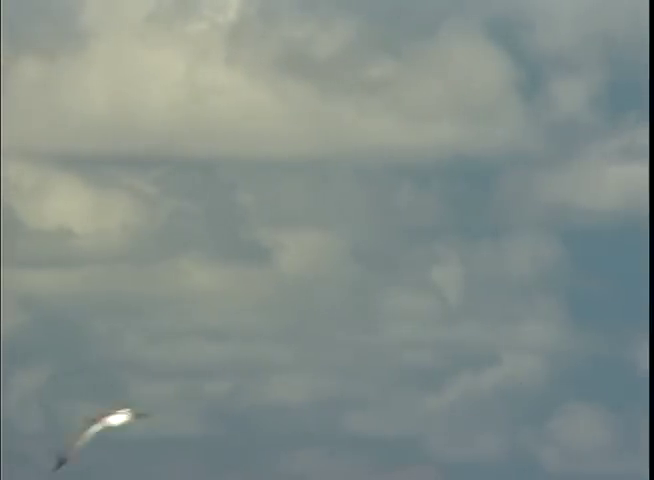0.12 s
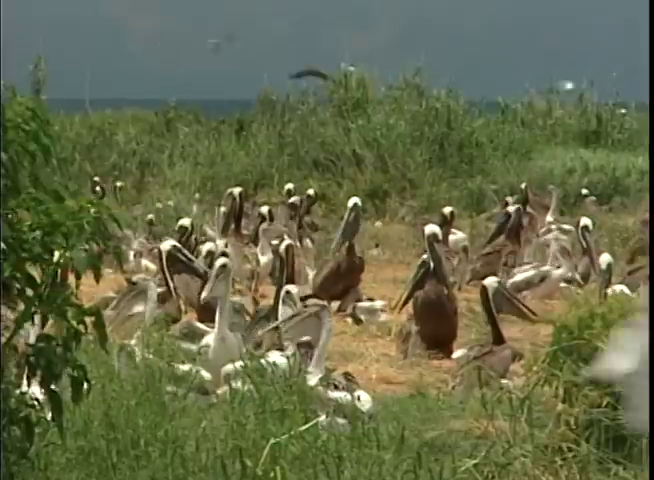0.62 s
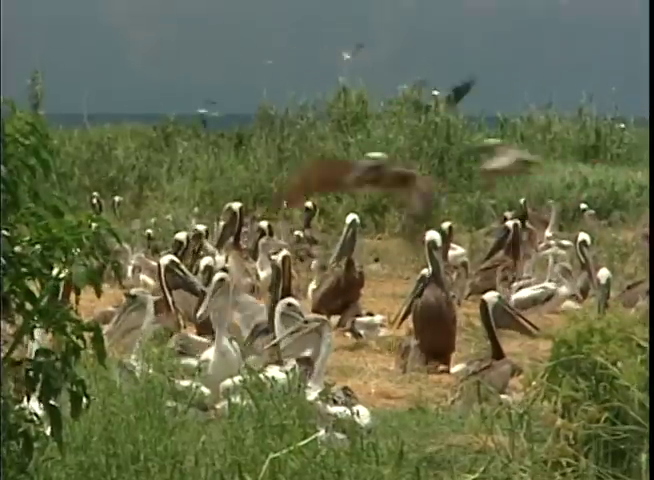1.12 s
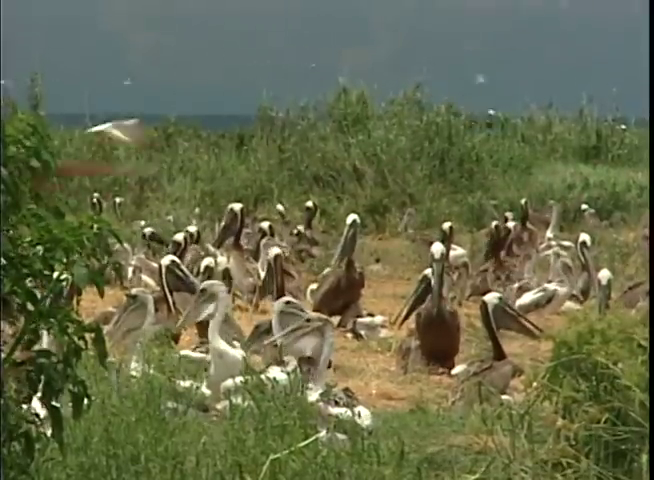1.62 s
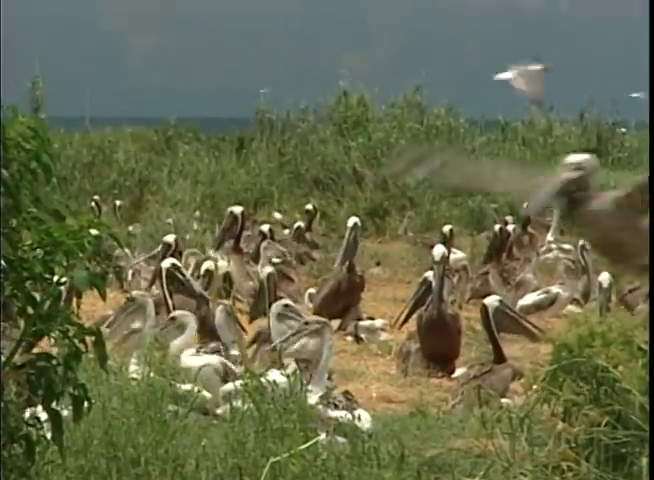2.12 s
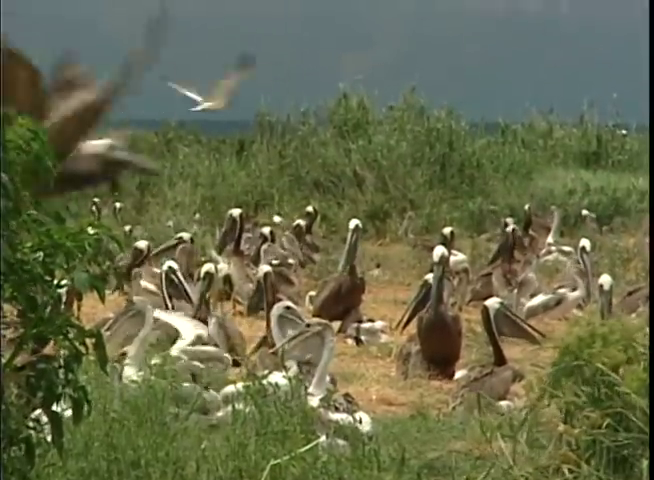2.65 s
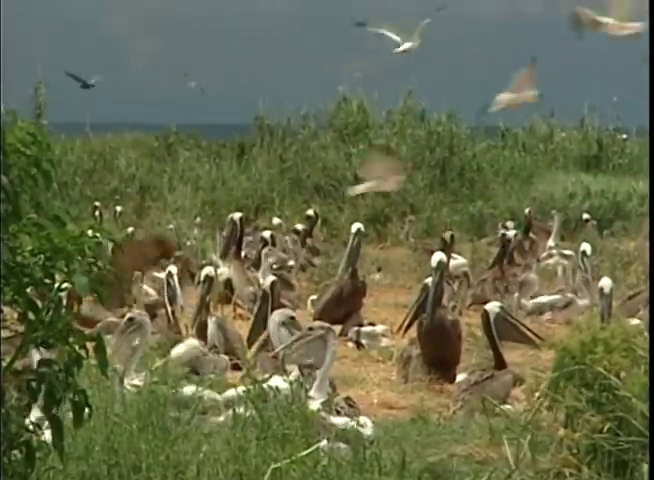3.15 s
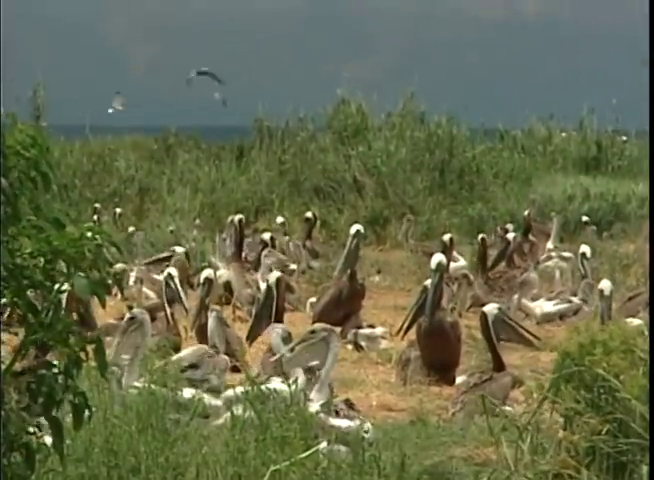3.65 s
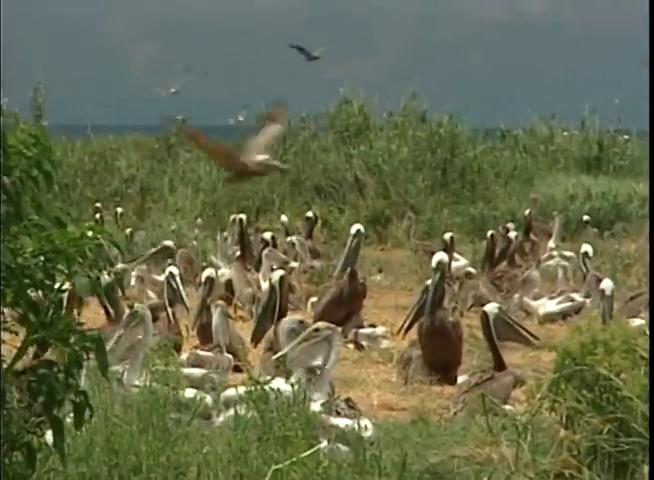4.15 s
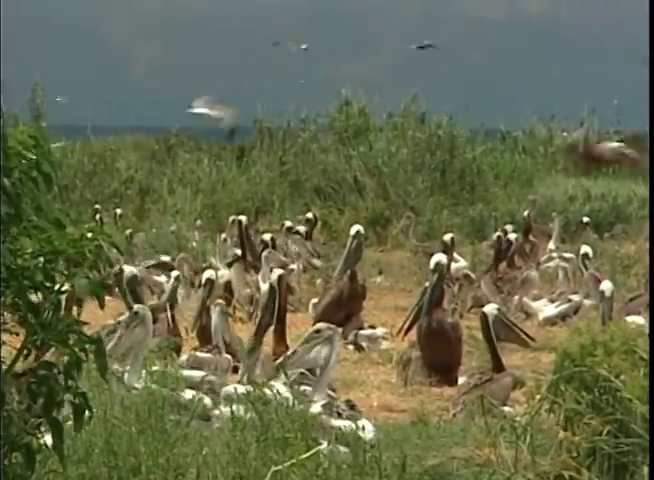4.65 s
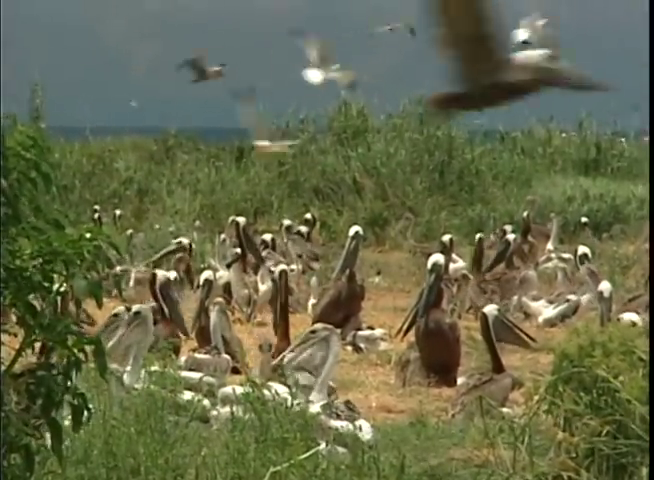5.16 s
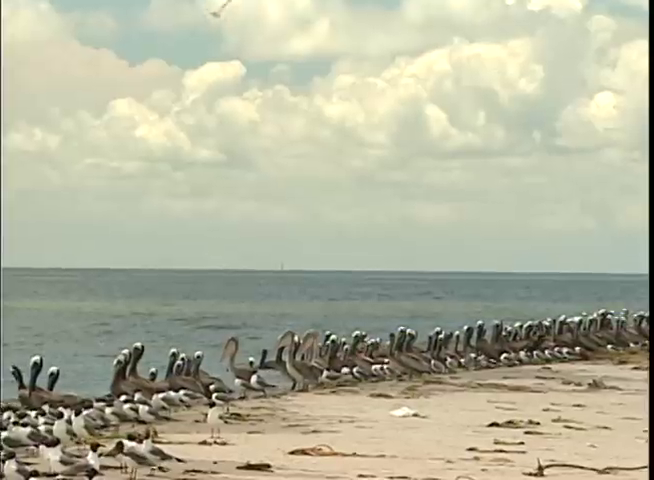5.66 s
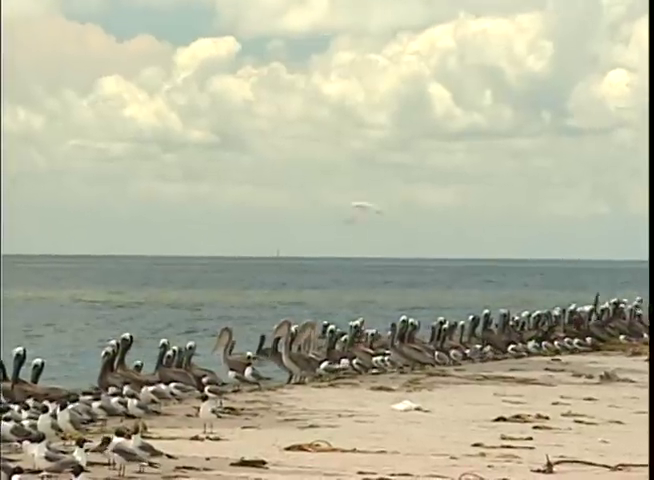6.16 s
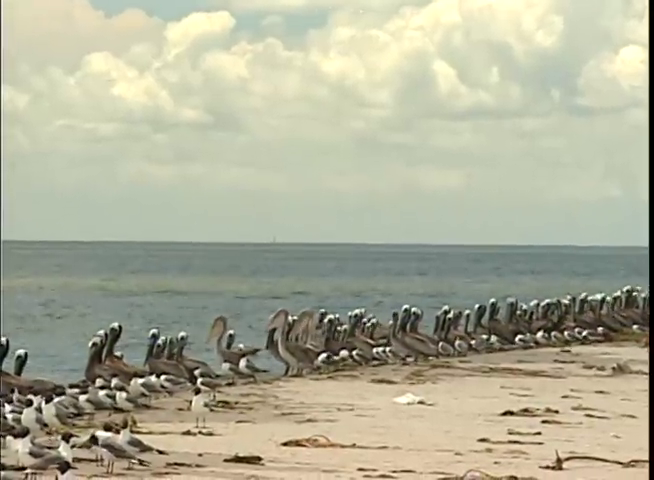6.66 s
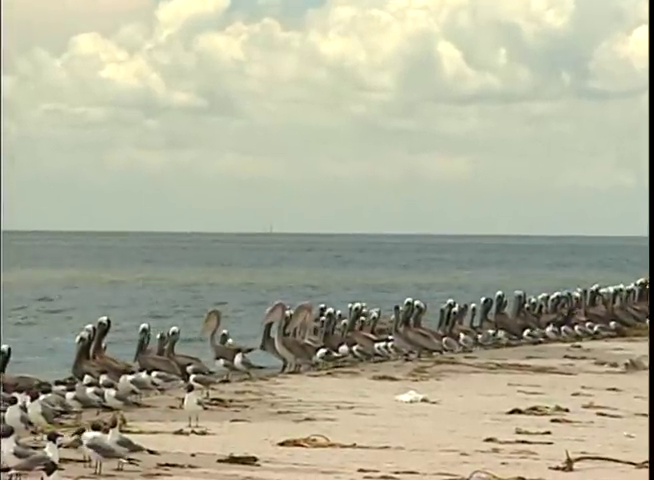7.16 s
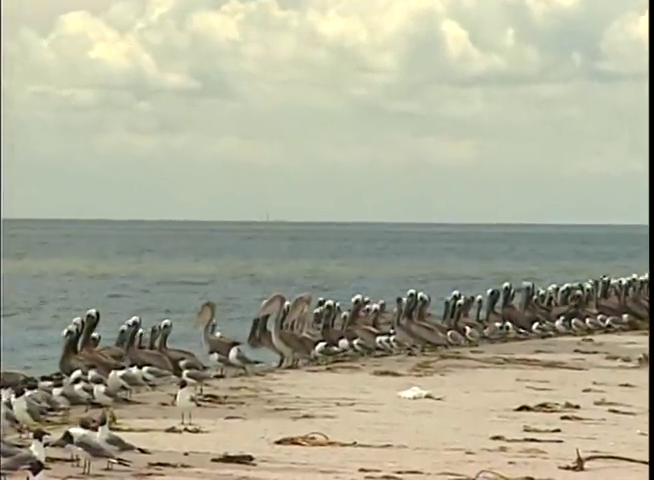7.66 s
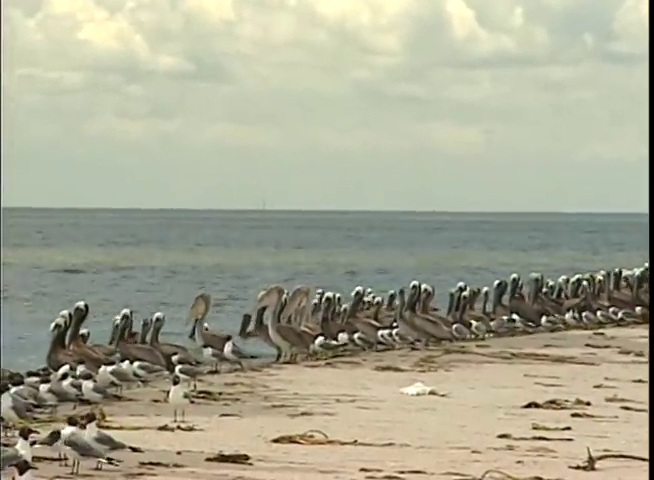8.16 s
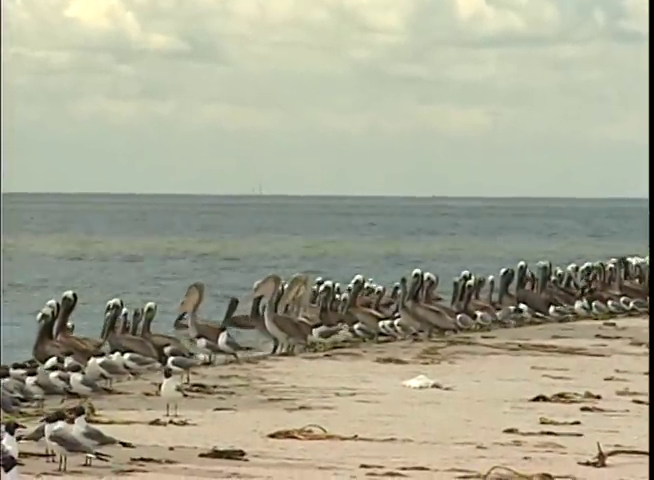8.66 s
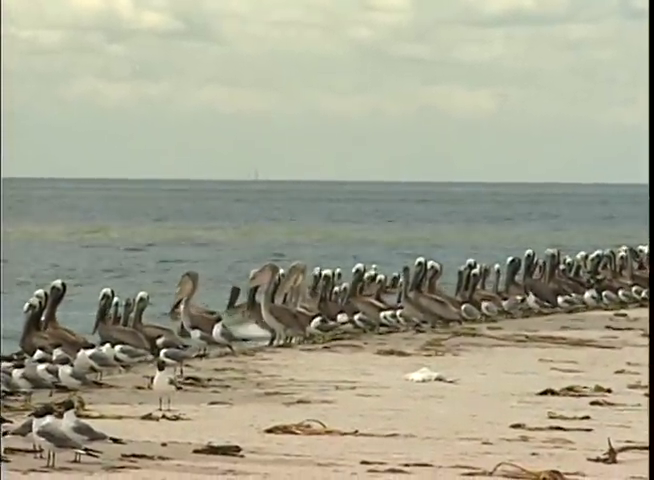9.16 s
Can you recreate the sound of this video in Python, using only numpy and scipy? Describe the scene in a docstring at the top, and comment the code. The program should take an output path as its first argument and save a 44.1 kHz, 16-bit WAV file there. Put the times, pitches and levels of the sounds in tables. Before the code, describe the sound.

Countless gulls and terns scream over each other, then an abrupt change to thinner cries, raspy terns, wind rumble and soft waves.

```python
"""Gulls and terns call over one another in a crowded colony, over blurred far voices and a faint camera hum.
Harmonic stacks make the squeals, calls, rattling laughs and wails; pulsed high noise adds treble grit.
At 5.728 s the scene moves to an open beach: sparser, weaker calls, over shaped noise for hiss and waves;
terns rasp in noise pulses that ring resonances. Low-frequency noise buffets the microphone throughout."""
import sys
import numpy as np
from scipy import signal
from scipy.fft import rfft, irfft
from scipy.io import wavfile
from scipy.ndimage import uniform_filter1d

SR = 44100
rng = np.random.default_rng(int(sys.argv[2]) if len(sys.argv) > 2 else 0)


def makeup_ratio(level_db):
    """Linear amplitude ratio for a level in decibels (20 dB per factor of ten)."""
    decades = np.asarray(level_db, float) / 20
    return 10 ** decades


def to_wav(sig):
    """Store sig (one row per channel, or 1-D mono) as 16-bit WAV at the path in sys.argv[1].

    Samples outside -1..1 are clipped; the rate is SR.
    """
    pcm = np.clip(np.atleast_2d(sig), -1, 1) * 32767
    pcm = np.round(pcm).astype(np.int16)
    wavfile.write(sys.argv[1], SR, pcm.T)  # frames by channels


N = 409688
TIME = np.arange(N) / SR
CUT_S = 5.728  # colony to beach


def evened(x):
    """Scales to rms 1."""
    return x / np.sqrt(np.mean(x ** 2) + 1e-20)


def read(points, hz):
    """Reads a curve along log frequency."""
    f, value = np.transpose(points)
    return np.interp(np.log(hz + 1), np.log(f + 1), value)


def follow(rows, t, column=1):
    """Reads a table column along its first column."""
    columns = np.transpose(rows)
    return np.interp(t, columns[0], columns[column])


def add(mix, start_s, sound):
    """Adds a sound in place, trimmed at the end of the mix."""
    part = mix[max(round(start_s * SR), 0):][:len(sound)]
    part += sound[:len(part)]


def wander(count, span):
    """Noise of rms 1, smoothed over span samples."""
    return evened(uniform_filter1d(rng.standard_normal(count), int(span)))


# Stereo likeness of the noises. Each row: frequency in Hz, left-right correlation 0-1.
LIKENESS = [(60, 0.995), (500, 1), (2000, 1), (5000, 0.92), (9000, 0.99), (15000, 0.51)]


def hiss(colour, patchy_db, size=1024):
    """Two-channel noise of rms 1 from random short-time spectra with drifting patches."""
    frames, hz = 4 * N // size + 5, np.fft.rfftfreq(size, 1 / SR)
    a, b, c, d, patches = rng.standard_normal((frames, len(hz), 5)).T
    patches = evened(uniform_filter1d(uniform_filter1d(patches, 8, 0), 8, 1))
    same = np.clip(read(LIKENESS, hz), -1, 1)[:, None]
    left = a + 1j * b
    right = same * left + np.sqrt(1 - same ** 2) * (c + 1j * d)
    spectra = np.array([left, right]) * makeup_ratio(read(colour, hz)[:, None] + patchy_db * patches)
    return evened(signal.istft(spectra, nperseg=size, noverlap=3 * size // 4)[1][:, :N])


# What an open beak passes. Each row: frequency in Hz, gain in dB.
THROAT = [(853, -21.5), (1530, -17.5), (2121, 1), (2872, 0), (3723, -3), (4673, -0.5), (5724, -7),
          (6874, -13), (8441, -21.5)]


def cry(pitch_hz, bright_db, odd_db, jitter, flutter, uneven_db=.7, shine_db=0, hoarse=.06, ringing=()):
    """A throat-coloured harmonic stack, unsteady in pitch and level, with edges of under 2 ms.
    bright_db is per octave about 3 kHz; ringing lists (harmonic, dB)."""
    count = len(pitch_hz)
    turns = np.cumsum(pitch_hz * (1 + jitter * wander(count, 51))) / SR
    k = np.arange(1, 15500 // pitch_hz.max() + 1)
    hz = k * pitch_hz.mean()
    db = read([(560, -57)] + THROAT + [(15000, -56.0)], hz)
    db += bright_db * np.log2(np.minimum(hz, 9000) / 3000) + odd_db * (k % 2)
    db += shine_db * np.clip(np.log2(hz / SHINE_HZ), 0, 1)
    db += sum(lift_db * (k == harmonic) for harmonic, lift_db in ringing)
    db += uneven_db * rng.standard_normal(len(k))  # head angle and ground echo favour some harmonics
    phases = turns * k[:, None] + rng.random((len(k), 1))
    stack = evened(makeup_ratio(db) @ np.cos(2 * np.pi * phases))
    t = np.arange(count) / SR
    breath = np.minimum(t / 0.00173, 1) * np.minimum(t[::-1] / 0.0018, 1)
    roughness = evened(uniform_filter1d(wander(count, 53), 40))
    return stack * breath * (1 + flutter * wander(count, 250.3) + hoarse * roughness)


SHINE_DB_PER_DB, SHINE_FROM_DB, SHINE_HZ = 2, -31, 6600


def shine(db):
    """Lift in dB of the top harmonics, more the nearer (louder) the bird."""
    return SHINE_DB_PER_DB * np.clip(db - SHINE_FROM_DB, 0, 8)


# Relative loudness of the bird mass, far din included. Each row: time in seconds, level in dB.
MASS_LEVEL = [(0.0, -22), (0.31, -26), (0.75, -25.5), (0.95, -24.5), (1.5, -28.5), (1.94, -24), (2.07, -27),
              (3.3, -25), (3.45, -33), (3.5, -27.5), (4.55, -27.5), (5.13, -26.5), (5.153, -30.5),
              (5.19, -25.5), (5.686, -25), (5.72, -26), (5.74, -38), (6.62, -36), (6.81, -39),
              (7.37, -38.5), (7.77, -36.5), (8.54, -35.5), (8.95, -38), (9.29, -36)]


def mass_gain():
    """Gain shared by the crowd and the far din as the mass of birds swells and thins."""
    return makeup_ratio(follow(MASS_LEVEL, TIME))


YELP_HZ = 1300  # below this a near call takes the whole lift
# The chest favours some harmonics. Each row: harmonic number, lift in dB.
YELP_LIFT = [(1, 6), (2, 4), (3, -2), (6, 3)]


def crowd(count=460):
    """Many birds in a steady stream: yelps that rise fast and sag, short high chirps, some throbbing."""
    out = np.zeros(N)
    for i, row in enumerate(rng.random((count, 8))):
        when, kind, height, span, arch, size, bright, throb = row
        chirp = kind < .35
        length_s = (.018 + .035 * span) if chirp else (.03 + .1 * span ** 2)
        u = np.linspace(0, 1, int(SR * length_s))
        base_hz = (1900 + 1200 * height) if chirp else (820 + 380 * height)
        pitch_hz = base_hz * (1 + (0.025 + .07 * arch) * (np.sin(np.pi * u ** .7) - .9 * u))
        throb_hz = 28 + 400 * throb ** 2
        pulse = np.tanh(2 * np.sin(2 * np.pi * throb_hz * u * len(u) / SR))
        beats = 1 + 0.26 * (throb < .5) * pulse
        voice = cry(pitch_hz, 5 * bright - 4.5, -4.0, jitter=0.0028, flutter=0.28, uneven_db=2.5,
                    hoarse=0.24, ringing=[] if chirp else YELP_LIFT[:1])
        start_s = (i + 4 * when) / count * N / SR - .08
        add(out, start_s, makeup_ratio(-7 * size - 0.83 * chirp) * beats * voice)
    out /= np.sqrt(uniform_filter1d(out ** 2, SR // 5) + 1e-12)  # a crowd this dense holds an even level
    return out * makeup_ratio(np.where(TIME < CUT_S, -6.0, -7.5))


# Far voices blurred together. Each row: frequency in Hz, relative density in dB per Hz.
COLONY_COLOUR = [(88, -43), (150, -8), (172, -20.5), (472, -23), (931, -15), (1180, -11.5), (1870, -1.5),
                 (2660, -6), (3490, -7), (4320, -7), (6000, -14.5), (13600, -40.5), (15600, -42)]


def colony_din(beach):
    """Far colony voices as patchy shaped noise, until the cut."""
    return (1 - beach) * makeup_ratio(-9.5) * hiss(COLONY_COLOUR, 3.0)


# The camera's own tone. Each row: frequency in Hz, colony level in dB rms.
HUM = [(123.8, -59.5)]


def hum(beach):
    """A sine of slightly wandering level, halved on the beach."""
    hz, rms_db = HUM[0]
    strength = (1 - .5 * beach) * (1 + 0.15 * wander(N, 2030)) * makeup_ratio(rms_db)
    return np.sqrt(2) * strength * np.sin(2 * np.pi * hz * TIME)


COLONY_BREEZE_DB, BEACH_BREEZE_DB = -62, -54.5  # between gusts, relative
LOW_CUT_HZ = 45  # the microphone's low cut thins the slowest rumble in the colony
GUST_EDGE_S = 0.064
# Gusts that buffet the microphone. Each row: start in seconds, length in seconds, relative level in dB.
GUSTS = [(0.206, 0.18, -42), (0.39, 0.15, -40.5), (1.046, 0.053, -47), (1.19, 0.088, -50), (5.7, 0.18, -45),
         (6.003, 0.71, -43), (6.755, 0.5, -44), (7.435, 0.37, -46), (8.053, 0.58, -53), (8.484, 0.53, -49),
         (8.9, 0.52, -45.5)]
# Rumble spectrum. Each row: frequency in Hz, relative density in dB per Hz.
WIND_COLOUR = [(8.8, -36), (15, 4), (45, 3), (112, -6.5), (147, -27.5), (220, -19.5), (290, -23.5),
               (480, -120)]


def wind(beach):
    """A lumpy low rumble: a light breeze with gusts on top, low-cut in the colony."""
    strength = makeup_ratio(COLONY_BREEZE_DB) * (1 - beach) + makeup_ratio(BEACH_BREEZE_DB) * beach
    for start_s, length_s, db in GUSTS:
        to_edge_s = np.minimum(TIME - start_s, start_s + length_s - TIME)
        strength = strength + makeup_ratio(db) * np.clip(to_edge_s / GUST_EDGE_S, 0, 1)
    rumble = hiss(WIND_COLOUR, 0.92, size=4096)
    thinned = signal.lfilter(*signal.butter(2, LOW_CUT_HZ, "high", fs=SR), rumble)
    return strength * makeup_ratio(1.6 * wander(N, 2104)) * (beach * rumble + (1 - beach) * thinned)


SQUAWK_HZ, SQUAWK_DULL_DB_PER_OCT = 1500, -7.0  # squeals below this are dull squawks
# Each row: middle in seconds, length in seconds, top pitch in Hz, level at the top in dB,
# lift of the odd harmonics in dB.
SQUEALS = [(0.038, 0.046, 2920, -33.5, -8), (.262, 0.03, 2470, -45, -12), (0.27, .03, 3280, -40, -12),
           (.312, .04, 3320, -41, -12), (0.318, .09, 3310, -42, 10), (0.579, 0.039, 2880, -32, -12),
           (0.723, 0.045, 2320, -33.5, -11), (0.836, 0.08, 2330, -41, -10), (1.076, 0.069, 1960, -31, 16),
           (1.294, 0.065, 2770, -38.5, 9), (1.745, 0.075, 2280, -32.5, -18),
           (1.837, 0.056, 2650, -30.5, -11), (2.11, 0.044, 2860, -38, -11),
           (2.216, 0.019, 3000, -30.5, -10), (2.256, 0.064, 2920, -40, -10), (2.782, 0.042, 3150, -38, -20),
           (2.866, 0.033, 2740, -37, 0), (2.962, 0.047, 2700, -41, 0), (2.933, 0.027, 2726, -31.5, -12),
           (2.971, 0.07, 2420, -36, 13), (3.029, 0.088, 2750, -33.5, -11), (3.08, 0.054, 2510, -29.5, -4),
           (3.702, 0.067, 3050, -34.5, 4), (3.775, 0.077, 3260, -39.5, -14), (5.585, 0.043, 2850, -38, -10),
           (5.627, 0.045, 3200, -35, -13), (5.66, 0.048, 3200, -36, -10), (5.696, 0.043, 3220, -39, -12),
           (6.333, 0.1, 2890, -46, 0), (8.847, 0.06, 2000, -41, -21), (8.982, 0.075, 728, -35, -1),
           (9.166, 0.056, 1985, -36.5, 16), (9.168, 0.065, 3100, -39.5, -3),
           (9.242, 0.061, 3070, -35, -5.5)]


def squeals():
    """One quick arch of pitch each; squawks bend deeper."""
    out = np.zeros(N)
    for middle_s, length_s, top_hz, db, odd_db in SQUEALS:
        u = np.linspace(-.8, 1.05, int(length_s * SR))
        squawk = top_hz < SQUAWK_HZ
        pitch_hz = top_hz * (1 - (0.145 + .16 * squawk) * u ** 2)
        voice = cry(pitch_hz, -2.0 + SQUAWK_DULL_DB_PER_OCT * squawk, odd_db, jitter=.007, flutter=.3,
                    shine_db=shine(db) + 10, hoarse=.35)
        add(out, middle_s - 0.44 * length_s, makeup_ratio(db - 3.5 * u ** 2) * voice)
    return out


ECHO_DB = -14


def ground_echo(birds):
    """Sparse echoes off ground and bushes, dying 60 dB in 79 ms, partly different in each channel."""
    taps = np.zeros((2, 8000))
    at = np.arange(100, 7980, 20) + rng.integers(0, 20, (2, 394))
    np.put_along_axis(taps, at, rng.choice([-1., 1.], at.shape), 1)
    taps *= makeup_ratio(-60 * np.arange(8000) / SR / 0.079)
    taps = 2.3 * taps[0] + 0.054 * signal.lfilter([1, -.9], 1, taps)  # the bass is alike in both
    echo = signal.oaconvolve(birds[None], taps / np.linalg.norm(taps[0]), axes=1)[:, :N]
    return makeup_ratio(ECHO_DB) * echo


SCOOP, SCOOP_S = .02, 0.008  # a call starts this share flat and slides up to pitch
HOLD_S = .09  # the longer a call is against this, the longer it holds its pitch before it glides
CALL_FADE_DB_PER_S = -19  # breath runs out along a call
FAR_DB, FAR_DULLING = -39, 1.2  # below this: dB per octave lost for each dB, over 6 dB at most
# The voice by register. Each row: pitch in Hz, brightness in dB per octave before far dulling,
# lift of the odd harmonics in dB.
REGISTERS = [(900, 1.5, -0.5), (1100, -2, -3.5), (1590, 7, -2.5), (1710, -26, 26), (2250, -4, 2),
             (2650, 7.5, 3), (3050, 2.5, -8.5)]
# Each row: start in seconds, length in seconds, first pitch in Hz, last pitch in Hz, starting level in dB.
NEAR_CALLS = [ (0.223, 0.026, 1677, 1530, -33), (0.309, 0.024, 1684, 1570, -46),
              (0.33, 0.11, 968, 900, -36), (0.405, 0.035, 1845, 1766, -37), (0.657, 0.087, 817, 790, -43),
              (0.811, 0.013, 2880, 2940, -35), (0.894, 0.05, 2000, 1626, -32),
              (1.012, 0.15, 947, 840, -30.5), (1.049, 0.097, 1149, 1052, -33.5),
              (1.054, 0.062, 1930, 1720, -55), (0.972, 0.027, 872, 955, -29.5),
              (1.235, 0.052, 2200, 1893, -32.5), (1.519, 0.013, 1966, 1940, -33),
              (1.538, 0.04, 2030, 1830, -34), (1.615, 0.043, 2070, 2030, -41),
              (2.0, 0.058, 956, 903, -31.5), (2.665, 0.075, 1380, 1600, -56), (4.394, .06, 1046, 840, -49),
              (0.118, 0.045, 2140, 1990, -35), (0.45, 0.037, 2285, 2580, -38.5),
              (1.721, 0.041, 1890, 1850, -50), (1.773, 0.037, 1780, 1810, -37.5),
              (1.856, 0.062, 962, 924, -33.5), (1.882, 0.027, 3120, 3160, -31.5),
              (0.804, 0.054, 2250, 2020, -46), (2.374, 0.026, 2246, 2165, -30.5),
              (2.448, 0.036, 1920, 1740, -35), (2.45, 0.034, 2170, 2185, -30),
              (2.511, 0.042, 2110, 2100, -36), (2.581, 0.06, 2010, 1770, -32.5),
              (2.555, 0.066, 1076, 950, -43), (2.65, 0.12, 1106, 1042, -32), (2.726, 0.13, 1846, 1980, -31),
              (2.828, 0.039, 2360, 2220, -32), (3.153, 0.041, 2346, 2040, -27),
              (3.214, 0.079, 1980, 1830, -35.5), (3.227, .19, 1110, 813, -32),
              (2.966, 0.093, 1656, 1590, -36), (3.655, 0.045, 2187, 2100, -27.5),
              (3.713, 0.068, 2250, 2240, -37), (3.844, 0.17, 1100, 966, -31), (4.043, .025, 877, 920, -32),
              (4.099, 0.11, 885, 868, -31.5), (4.144, 0.17, 960, 1124, -34.5),
              (4.334, 0.05, 1338, 1290, -35.5), (4.448, 0.03, 2950, 2740, -38.5),
              (4.567, 0.15, 1093, 970, -28.5), (4.705, 0.034, 907, 848, -36),
              (4.633, 0.021, 2380, 2230, -38), (4.753, 0.057, 907, 873, -35.5),
              (4.78, 0.17, 1885, 1745, -39.5), (4.838, 0.077, 2313, 2280, -37),
              (5.162, 0.019, 2250, 2220, -28), (5.195, 0.037, 1270, 1210, -30.5),
              (5.274, 0.026, 900, 906, -34.5), (5.359, 0.089, 975, 955, -32),
              (5.361, 0.065, 2560, 2250, -32), (5.434, 0.066, 2325, 2370, -33.5),
              (5.498, 0.059, 1640, 1750, -38), (5.492, 0.096, 1133, 1017, -29.5),
              (5.588, 0.061, 1003, 1040, -33.5), (5.667, 0.05, 2190, 1996, -33),
              (5.85, 0.039, 2240, 2240, -52), (5.853, 0.072, 2880, 2570, -42),
              (5.923, 0.089, 1042, 1010, -61), (5.942, 0.065, 3150, 3080, -40),
              (6.065, 0.027, 2250, 2210, -42), (6.171, 0.02, 1590, 1550, -40.5),
              (6.612, 0.046, 3000, 2900, -49), (6.62, 0.027, 2540, 2520, -43),
              (6.655, 0.036, 2300, 2220, -44), (6.71, 0.027, 2210, 2160, -50),
              (6.992, 0.039, 2700, 2530, -46), (6.239, 0.029, 2850, 2920, -37.5),
              (6.494, 0.021, 1560, 1460, -32), (6.739, 0.038, 3080, 3110, -39),
              (6.772, 0.045, 3050, 2940, -39.5), (6.84, 0.11, 3050, 2880, -44),
              (7.061, 0.032, 2760, 2860, -43), (7.091, 0.039, 2870, 2640, -47),
              (7.463, 0.16, 2290, 2250, -46.5), (7.6, 0.14, 2560, 2410, -43.5),
              (7.63, 0.065, 1092, 946, -41), (7.287, 0.072, 2360, 2160, -43.5),
              (7.775, 0.041, 2650, 2490, -45), (7.695, 0.043, 3200, 3020, -39),
              (8.012, 0.039, 1560, 1435, -30.5), (8.383, 0.081, 2300, 2320, -47),
              (8.451, 0.059, 3110, 2890, -39), (8.481, 0.025, 1590, 1525, -34), (8.6, 0.015, 800, 970, -44),
              (9.018, 0.085, 1070, 1130, -54), (9.265, 0.026, 1100, 1060, -53),
              (8.64, 0.05, 2180, 2180, -46), (8.725, 0.24, 2560, 2280, -46.5),
              (9.007, 0.037, 3120, 2980, -45), (9.045, 0.026, 3050, 3020, -46),
              (9.198, 0.026, 2650, 2770, -43), (9.258, 0.032, 2855, 2620, -36.5), ]


def near_calls():
    """Each call glides from its first pitch towards its last, in the voice of its register."""
    out = np.zeros(N)
    for start_s, length_s, first_hz, last_hz, db in NEAR_CALLS:
        t = np.arange(-.003, length_s + 0.0081, 1 / SR)
        glide = (np.maximum(t, 0) / length_s) ** (1 + length_s / HOLD_S)
        pitch_hz = first_hz + (last_hz - first_hz) * glide
        pitch_hz *= 1 - SCOOP * np.exp((t[0] - t) / SCOOP_S)
        bright_db, odd_db = follow(REGISTERS, first_hz), follow(REGISTERS, first_hz, column=2)
        bright_db += FAR_DULLING * np.clip(db - FAR_DB, -6, 0)
        voice = cry(pitch_hz, bright_db, odd_db, jitter=0.0014, flutter=0.14, uneven_db=1.7,
                    shine_db=shine(db), ringing=YELP_LIFT if first_hz < YELP_HZ else [])
        add(out, start_s + t[0], makeup_ratio(db + CALL_FADE_DB_PER_S * t) * voice)
    return out


# Dull knocks and plops near the microphone. Each row: start in seconds, relative level in dB, frequency in Hz.
KNOCKS = [(0.261, -41, 88), (0.298, -41, 107), (0.414, -29.5, 116), (0.468, -54, 72.7), (1.052, -45, 107),
          (1.188, -48, 78.4), (7.45, -34, 420), (7.696, -32.5, 275), (8.05, -29, 420), (8.162, -24.5, 490)]


def knocks():
    """A few sine cycles that start softly and die at once."""
    out = np.zeros(N)
    for start_s, db, hz in KNOCKS:
        cycles = np.arange(0, 6, hz / SR)
        envelope = cycles / 0.27 * np.exp(1 - cycles / 0.38)
        add(out, start_s, makeup_ratio(db) * np.sin(2 * np.pi * cycles) * envelope)
    return out


SCREECH_FADE_DB = -3  # start to end
# Each row: start in seconds, length in seconds, starting level in dB.
SCREECHES = [(0.973, .2, -52), (1.81, 0.083, -54), (2.2, 0.17, -54), (2.36, .06, -53), (3.037, 0.1, -52),
             (3.444, 0.19, -55), (3.668, 0.028, -47), (4.817, .07, -56), (5.577, .13, -59),
             (7.886, 0.36, -55)]


def screeches():
    """High noise in about 120 uneven pulses a second: treble grit on the calls."""
    out = np.zeros(N)
    band = signal.butter(2, [8500, 13000], "band", fs=SR, output="sos")
    for start_s, length_s, db in SCREECHES:
        u = np.linspace(0, 1, int(length_s * SR))
        beat = np.cumsum(120 * (1 + 0.12 * wander(len(u), 500))) / SR % 1
        drive = (0.9 + np.exp(-beat / 0.3)) * rng.standard_normal(len(u))
        grit = evened(signal.sosfilt(band, drive))
        level = makeup_ratio(db + SCREECH_FADE_DB * u + 2.5 * wander(len(u), 600))
        add(out, start_s, level * grit * signal.windows.tukey(len(u), .6))
    return out


RING_DB = 5  # lift of the second, fourth and eighth harmonics
# Laughs, a row a syllable. Each row: start in seconds, relative level in dB, fourth harmonic in Hz,
# length in seconds before a 2.4 ms tail, further lift of the eighth harmonic in dB.
RATTLE = [(1.325, -34, 2530, 0.013, -8), (1.374, -33, 2490, 0.017, -13), (1.408, -33, 2440, 0.012, -12),
          (1.44, -29, 2500, 0.0097, -10), (1.462, -28.5, 2550, 0.021, -12), (1.485, -29, 2140, 0.017, -10),
          (2.189, -31, 2600, 0.02, -12), (2.217, -28, 2570, 0.02, -12), (2.251, -25, 2490, 0.014, -14),
          (2.275, -27, 2440, 0.027, -16), (2.305, -27, 2360, 0.024, -12), (2.329, -26, 2300, 0.024, -12),
          (3.442, -26, 2750, .01, -2), (3.453, -26.5, 2340, 0.014, -4), (3.482, -24, 2300, 0.022, -12),
          (3.506, -23.5, 2443, 0.025, -10), (3.536, -30, 2420, 0.0079, -10), (3.541, -23, 2370, 0.018, -13),
          (3.557, -28, 2290, 0.0093, -10), (3.569, -22.5, 2380, 0.018, -15), (3.596, -24, 2340, 0.017, -12),
          (3.622, -24.5, 2305, 0.027, -16), (4.824, -29, 2350, 0.025, 4), (4.879, -33, 2110, 0.031, -8),
          (4.905, -39, 2330, 0.031, -8), (4.943, -27, 2290, 0.014, -10), (4.996, -29, 2590, 0.019, -10),
          (5.038, -32, 2600, 0.017, -10), (5.07, -36, 2140, 0.012, -12), (5.089, -29, 2465, .02, -10),
          (5.119, -30, 2150, 0.009, -10), (5.131, -26, 2460, 0.015, 4), (5.206, -35, 2510, 0.026, -2),
          (5.244, -27, 2550, 0.013, 12), (5.272, -28, 2500, 0.011, 12), (5.312, -33, 2470, 0.01, 10),
          (5.329, -25.5, 2490, 0.01, 10), (5.364, -33, 2490, 0.01, 0), (5.397, -26, 2450, 0.012, 1)]


def rattle():
    """Short low syllables in quick succession, each sagging a little, with ringing harmonics."""
    out = np.zeros(N)
    for start_s, db, fourth_hz, length_s, eighth_db in RATTLE:
        sag = np.linspace(1.01, .98, int((length_s + 0.0024) * SR))
        ringing = [(2, RING_DB), (4, RING_DB), (8, RING_DB + eighth_db)]
        voice = cry(fourth_hz / 4 * sag, -4.5, 1.0, jitter=.003, flutter=.08, uneven_db=1.5,
                    shine_db=10, hoarse=.1, ringing=ringing)
        add(out, start_s, makeup_ratio(db - 2.0 + np.linspace(0, -4, len(sag))) * voice)
    return out


# Each row: start in seconds, length in seconds, pitch in Hz, depth of the dip 0-1 before smoothing,
# starting level in dB, lift of the odd harmonics above the first in dB.
WAILS = [(1.931, 0.138, 1005, 0.04, -30.5, -8.5), (4.975, 0.125, 1003, 0.05, -32.5, -0.5),
         (8.621, .21, 990, .11, -35.5, -4)]
# Pitch contour. Each row: share of the length, share of the dip.
WAIL_SHAPE = [(0, -0.63), (.12, .5), (.27, 1), (.6, 0), (.8, .05), (1, 0.92)]


def wails():
    """A gull's drawn-out cry that drops, climbs back and falls away, strongest at the start."""
    out = np.zeros(N)
    for start_s, length_s, hz, depth, db, odd_db in WAILS:
        u = np.linspace(0, 1, int(length_s * SR))
        dip = uniform_filter1d(follow(WAIL_SHAPE, u), len(u) // 8, mode="nearest")
        ringing = [(1, 7 - odd_db), (2, -odd_db)]
        voice = cry(hz * (1 - depth * dip), 0.0, odd_db, jitter=0.0012, flutter=0.1, uneven_db=1.2,
                    shine_db=shine(db), ringing=ringing)
        add(out, start_s, makeup_ratio(db - 24 * length_s * u) * voice)
    return out


# Far voices over the sea's hiss. Each row: frequency in Hz, relative density in dB per Hz.
BEACH_COLOUR = [(88, -15), (150, -15), (197, -13), (828, 1), (1730, -4), (2870, 3), (3420, -4.5), (4400, 3),
                (5040, -7.5), (5890, -6), (9760, -18), (11000, -18.5), (15600, -29)]


def beach_din(beach):
    """Far voices and sea hiss as patchy shaped noise, from the cut on."""
    return beach * makeup_ratio(-1.0) * hiss(BEACH_COLOUR, 2.75)


# Wash on the sand. Each row: time in seconds, relative level in dB.
WAVES = [(5.74, -46), (6.15, -43), (7.84, -46), (8.31, -37), (8.42, -45), (9.29, -54.5)]
# Wash spectrum. Each row: frequency in Hz, relative density in dB per Hz.
WAVE_COLOUR = [(120, -4), (200, 0), (400, 3), (900, -1.5), (1600, 0), (4000, -48), (12000, -32)]


def waves(beach):
    """Small waves as shaped noise that swells and recedes."""
    return beach * makeup_ratio(follow(WAVES, TIME) - 1.0) * hiss(WAVE_COLOUR, 2.36)


def resonate(x, hz, width_hz):
    """One resonance: shifts the curve hz down to zero, smooths twice, and shifts back."""
    turn = np.exp(2j * np.pi * np.cumsum(hz) / SR)
    r = np.exp(-np.pi * width_hz / SR)
    smooth = signal.lfilter([(1 - r) ** 2], [1, -2 * r, r * r], x / turn)
    return 2 * (turn * smooth).real


RASP_RISE_DB = 5.5  # start to end
# Each row: start in seconds, length in seconds, starting level in dB, middle resonance in Hz.
RASPS = [(6.475, 0.069, -44, 4430), (6.37, 0.092, -39, 4330), (6.663, 0.064, -48, 4430),
         (7.102, 0.07, -45, 3960), (7.25, 0.075, -47, 4430), (7.613, 0.071, -39.5, 4300),
         (7.708, 0.079, -45, 4630), (7.895, 0.11, -36, 4240), (8.354, 0.085, -41, 4500),
         (8.49, 0.092, -43.5, 4480), (8.864, 0.049, -48, 4200), (9.129, 0.03, -39, 4260)]
# Throat resonances. Each row: factor on the middle resonance, width in Hz, gain in dB.
RASP_MODES = [(.67, 300, -3), (1.0, 350, 3.5), (1.36, 400, -2.5), (1.7, 500, -12.5)]


def rasps():
    """A tern's noisy voice chopped into about 112 pulses a second, each ringing the throat."""
    out = np.zeros(N)
    for start_s, length_s, level_db, middle_hz in RASPS:
        u = np.linspace(0, 1, int(length_s * SR))
        beat = np.cumsum(112 * (1 + 0.072 * wander(len(u), 390))) / SR % 1
        drive = np.exp(-((beat - .5) / 0.26) ** 2) * rng.standard_normal(len(u))
        ring = sum(makeup_ratio(db) * resonate(drive, np.full(len(u), factor * middle_hz), width_hz)
                   for factor, width_hz, db in RASP_MODES)
        level = makeup_ratio(level_db + RASP_RISE_DB * u)
        add(out, start_s, level * evened(ring) * signal.windows.tukey(len(u), .3))
    return out


def scene():
    """Colony, then beach, switched in 2.3 ms."""
    beach = np.clip((TIME - CUT_S) / 0.0023 + .5, 0, 1)
    mass = mass_gain() * (crowd() + colony_din(beach) + beach_din(beach))
    birds = squeals() + near_calls() + screeches() + rattle() + wails() + rasps()
    return mass + hum(beach) + wind(beach) + birds + ground_echo(birds) + knocks() + waves(beach)


def band_limit(x):
    """A steep low-pass at the top of the band."""
    return signal.sosfilt(signal.butter(12, 15700, fs=SR, output="sos"), x)


LEAD_US = 18  # how much earlier the left channel is
# How much louder the left channel is. Each row: frequency in Hz, difference in dB.
LEFT_GAIN = [(150, 1.7), (350, 1.3), (700, .5), (2000, 1.2), (15000, .9)]


def record(dry):
    """The two channels differ a little in gain and timing, half on each side."""
    side = np.array([[.5], [-.5]])
    hz = np.fft.rfftfreq(N, 1 / SR)
    lead = np.exp(2j * np.pi * hz * LEAD_US * 1e-6 * side)
    mix = irfft(rfft(dry) * lead * makeup_ratio(read(LEFT_GAIN, hz) * side), N)
    return band_limit(mix)


dry = scene()
out = record(dry)
to_wav(out)
```